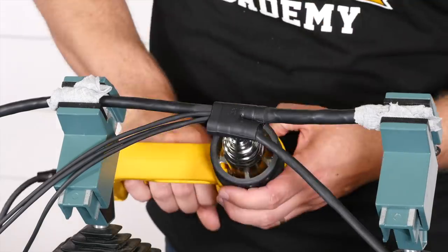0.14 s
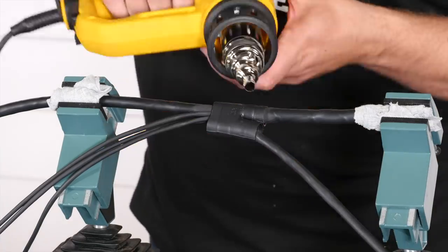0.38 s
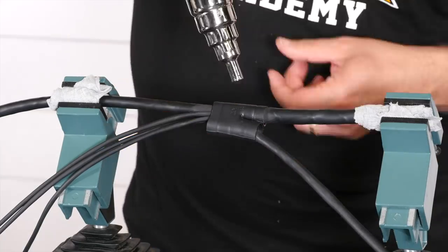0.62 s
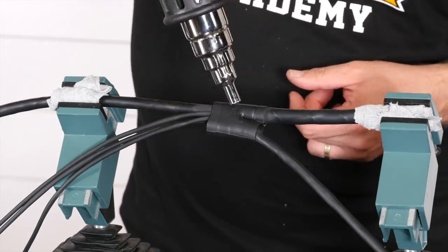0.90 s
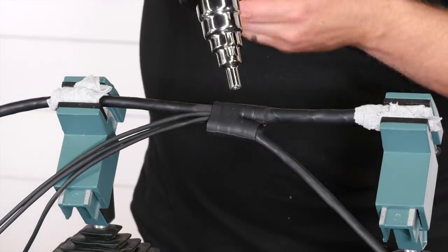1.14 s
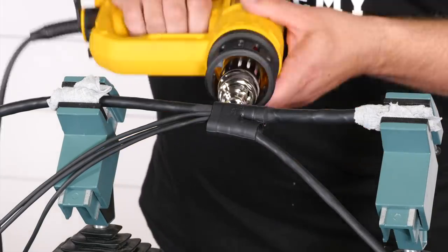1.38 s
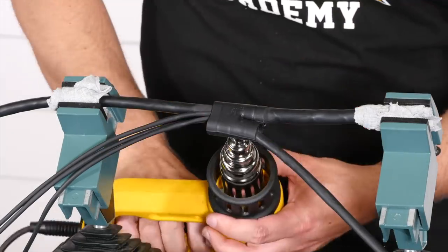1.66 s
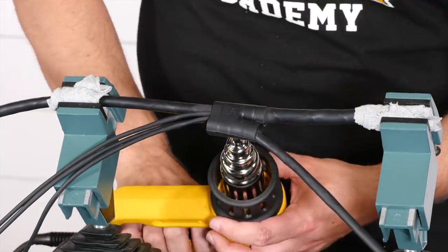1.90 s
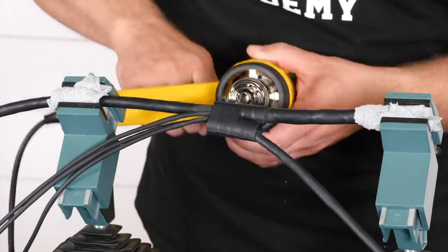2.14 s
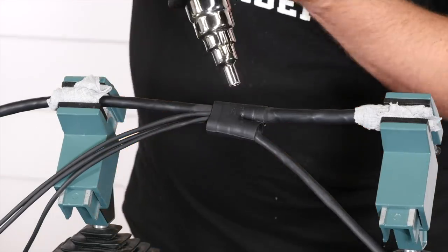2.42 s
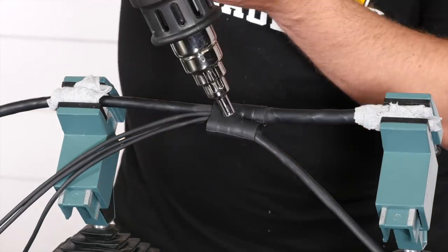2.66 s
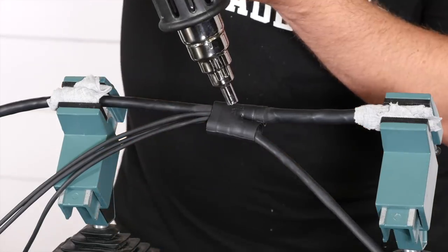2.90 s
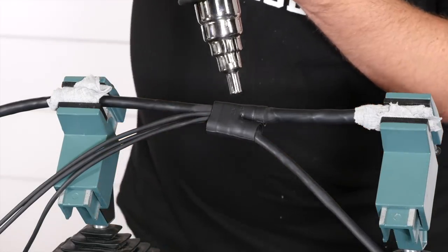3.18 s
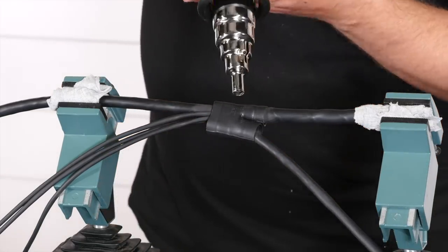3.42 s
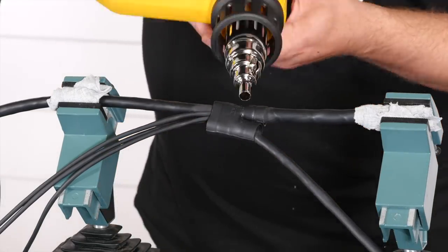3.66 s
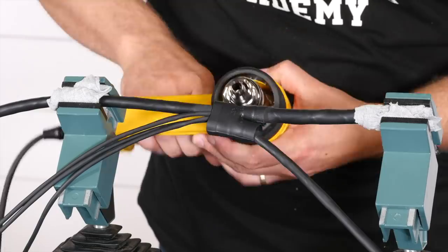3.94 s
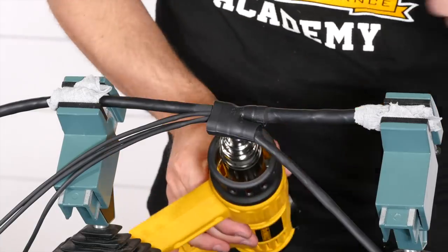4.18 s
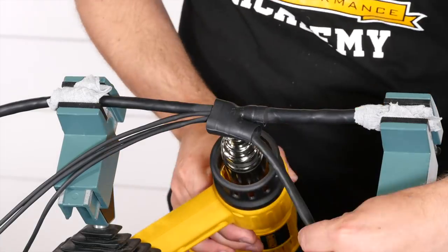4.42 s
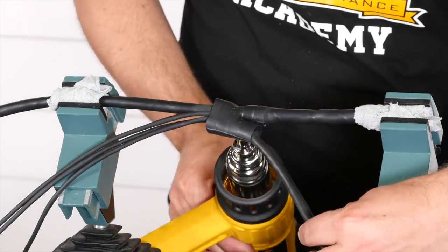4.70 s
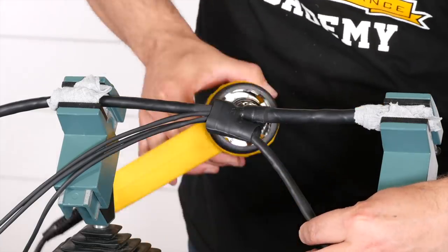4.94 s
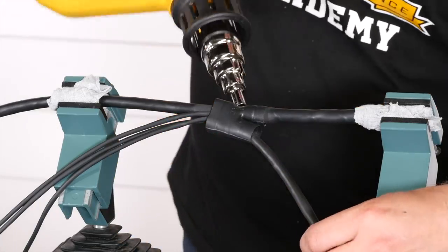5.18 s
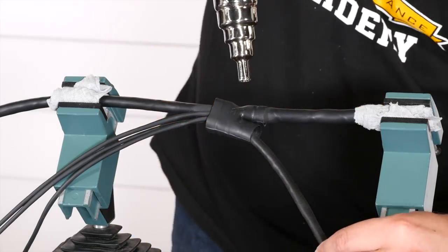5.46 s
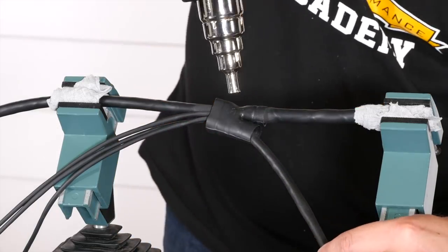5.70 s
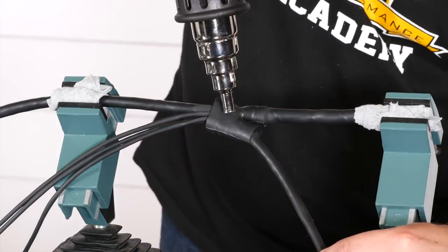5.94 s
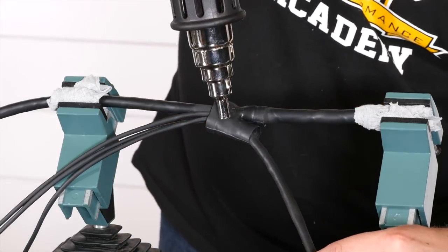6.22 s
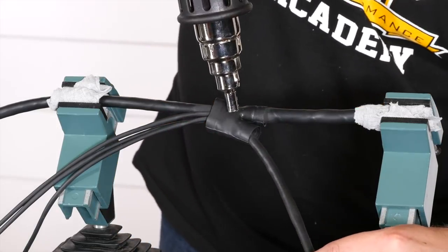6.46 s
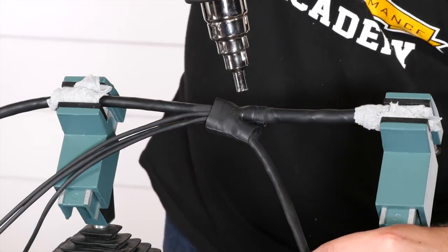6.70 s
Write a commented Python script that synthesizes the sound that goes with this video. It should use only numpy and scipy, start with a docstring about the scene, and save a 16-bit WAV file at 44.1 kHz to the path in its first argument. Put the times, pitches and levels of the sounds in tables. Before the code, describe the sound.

A heat gun runs without pause close by in a workshop. Its hissing airflow and high, layered fan whine shift in tone as the nozzle turns around a cable splice. A few soft plastic knocks come early, then a small knock and faint cable rubbing past the middle. Low machine hum lies underneath; the stereo pickup is close, with slight wall reflections.

```python
"""A fan whines and air rushes as an electric heat gun is swung around a cable splice on a workbench.
The whine is a stack of sines on the blade tone; the rush is shaped noise from the barrel, and its
colour changes as the gun turns. Steady workshop hums, made of wavering sines, and a low noise floor
lie underneath. The harness knocks softly in its clamps as short rings and drags as narrow noise."""
import sys
import numpy as np
from scipy import signal
from scipy.fft import rfft, irfft, next_fast_len
from scipy.io import wavfile
from scipy.ndimage import uniform_filter1d

SR = 44100
rng = np.random.default_rng(int(sys.argv[2]) if len(sys.argv) > 2 else 0)


def persist_wave(psi):
    """Save psi, clipped to +-1, as 16-bit WAV."""
    counts = np.round(np.clip(psi, -1, 1) * 32767).astype(np.int16)
    wavfile.write(sys.argv[1], SR, np.atleast_2d(counts).T)


def ratio_of_db(decibels):
    """Turn decibels (scalar or array-like) into linear amplitude factors; 0 dB maps to 1."""
    return 10 ** (np.asarray(decibels, float) / 20)


N = 301644  # length in samples
T = np.arange(N) / SR  # time in seconds
SIZE = next_fast_len(N)
F = np.arange(SIZE // 2 + 1) * SR / SIZE  # frequencies of the spectrum in Hz

# The ringing modes of the clamp. Each row: frequency in Hz, level in dB added to that of the knock,
# time to fade by 60 dB in seconds.
CLAMP = [(410, -9, .05), (490, 0, .07), (650, -1, .06), (980, -4, .05)]
# The swing of the gun. Each row: time in seconds, tilt (0 behind the cable, 1 side-on, 2 tipping down,
# 3 or more nozzle down), level of the rush in dB.
SWING = [(0, 0.6, -1.1), (.13, .5, -.4), (.26, 0.5, -1.3), (.39, 1, 0.65), (.52, 1.4, -1.2),
         (.65, 2.5, 0.3), (.78, 3, -0.38), (1.06, 3, -0.39), (1.3, 2.05, 0), (1.43, 1, -0.63),
         (1.7, 0.26, -0.51), (2.09, 0.36, -.6), (2.22, 0.96, -1), (2.35, 1, -.9), (2.64, 3.5, -.1),
         (3.14, 3, -0.4), (3.5, 2, .3), (3.76, 1, -.5), (4.04, 1, -1), (4.16, 0.6, -1.6), (4.28, 0, -.6),
         (4.85, 0, -.5), (5.07, 0.56, -.7), (5.2, 1, -0.54), (5.31, 2, -.7), (5.47, 2, -.8),
         (5.72, 3, -0.034), (5.98, 3, 0.065), (6.84, 3, -.2)]


def curve(points):
    """Joins (Hz, value) points with straight lines on a log-frequency axis."""
    hz, value = np.transpose(points)
    return np.interp(np.log(F + 1), np.log(hz), value)


def noise(density):
    """Random noise whose spectrum follows the given power per Hz (two-sided)."""
    white = rfft(rng.standard_normal(SIZE))
    return irfft(white * np.sqrt(density * SR), SIZE)[:N]


def walk(rate):
    """A slow random wander: levels held for 1 / rate seconds, smoothed twice, with a spread near 1."""
    hold = int(SR / rate)
    steps = np.repeat(rng.standard_normal(N // hold + 1), hold)
    smooth = uniform_filter1d(uniform_filter1d(steps, hold), hold)
    return 1.284 * smooth[:N]  # makes up for the spread lost in smoothing


def tone(phase, db):
    """A sine of the given rms level in dB, from a random starting point."""
    return np.sqrt(2) * ratio_of_db(db) * np.sin(phase + 2 * np.pi * rng.random())


def scatter(echo_db, decay_s):
    """Ripple in power, about 1 on average, left by a short spray of echoes off bench, hands and clamps."""
    t = T[:SR // 50]
    spray = rng.standard_normal(len(t)) * np.exp(-t / decay_s)
    unit_spray = spray / np.sqrt(np.sum(spray ** 2))
    echoes = ratio_of_db(echo_db) * rfft(unit_spray, SIZE)
    return abs(1 + echoes) ** 2 / (1 + ratio_of_db(echo_db) ** 2)


def poses():
    """Power share of each pose: behind the cable, side-on, tipping down, down high, down close."""
    close_from_s = 5.0  # from here the nozzle comes down close to the splice
    s, tilt, _ = np.transpose(SWING)
    tilt_now = np.clip(np.interp(T, s, tilt), 0, 3)
    # neighbouring poses blend into each other
    shares = np.clip(1 - abs(tilt_now - np.arange(4)[:, None]), 0, 1)
    behind, side_on, tipping, down = shares
    close = T > close_from_s
    return np.array([behind, side_on, tipping, down * ~close, down * close])


def hums():
    """Steady machine hums: sines that waver a little in pitch and level."""
    # Each row: frequency in Hz, rms level in dB, both before wavering.
    hum_tones = [(242.2, -69), (473.7, -74), (576.0, -60), (1152, -68)]
    total = 0
    for hz, db in hum_tones:
        phase = 2 * np.pi * np.cumsum(hz + 0.5 * walk(2.975)) / SR
        total = total + tone(phase, db + 0.55 * walk(6))
    return total


def shop_floor():
    """Low workshop noise that reaches both sides alike."""
    # Each row: frequency in Hz, power in dB per Hz.
    floor_points = [(20, -102), (200, -102), (330, -100), (450, -98), (700, -94), (900, -91.5),
                    (1050, -97.5), (1300, -92), (2000, -110)]
    return noise(ratio_of_db(curve(floor_points)) ** 2)


def shop_floor_wide():
    """The part of the low workshop noise that differs between left and right."""
    # Each row: frequency in Hz, power in dB per Hz.
    wide_points = [(20, -106), (300, -107), (950, -109), (1400, -116), (2000, -125)]
    return noise(ratio_of_db(curve(wide_points)) ** 2)


def knocks():
    """Each nudge rings the clamp with its own mix of fading modes, with a small plastic click on top."""
    # Harness in its clamps. Each row: start in seconds, base level of the clamp modes in dB,
    # base level of the click modes in dB.
    nudges = [(.250, -52, -50), (.356, -70, -47), (.381, -70, -33), (.463, -43, -36), (2.313, -53, -60),
              (4.312, -46, -48), (4.620, -46, -60), (4.665, -52, -62), (4.697, -50, -62), (4.812, -52, -62)]
    # Modes of the click. Each row: frequency in Hz, level in dB added to that of the click,
    # time to fade by 60 dB in seconds.
    click_modes = [(1150, -9, .03), (1650, -2, .03), (1830, 0, .03), (2050, -1, .025)]
    out = np.zeros(N + SR)
    t = T[:SR // 4]
    soft_contact = 1 - np.exp(-t / 0.0015)
    mix = rng.standard_normal((len(nudges), len(CLAMP) + len(click_modes)))
    for (s, db, click_db), chance in zip(nudges, mix):
        modes = [(hz, db + gain, t60) for hz, gain, t60 in CLAMP]
        modes += [(hz, click_db + gain, t60) for hz, gain, t60 in click_modes]
        ring = 0
        for (hz, level, t60), c in zip(modes, chance):
            fade = 1000 ** (-t / t60)
            ring = ring + ratio_of_db(level + 1.2 * c) * np.sin(2 * np.pi * hz * t) * fade
        i = int(s * SR)
        out[i:i + len(t)] += ring * soft_contact
    return out[:N]


def rub():
    """The cable drags in its clamp: uneven friction keeps the clamp's main mode ringing."""
    # Cable drags. Each row: start in seconds, length in seconds, rms level in dB before it flickers.
    drags = [(4.32, .22, -66), (4.55, .18, -63), (4.78, .09, -62)]
    edge_s = 0.046  # fade time, centred on each end of a drag
    shape = 0
    for s, length, db in drags:
        inside = np.minimum(T - s, s + length - T)
        shape = shape + ratio_of_db(db) * np.clip(inside / edge_s + 0.5, 0, 1)
    hz, _, t60 = CLAMP[1]
    # the longer a mode rings, the narrower its peak
    detune = (F - hz) * np.pi * t60 / np.log(1000)
    drag = noise(1 / (1 + detune ** 2) ** 2)
    return drag / drag.std() * shape * ratio_of_db(2 * walk(40))


def wall_rush():
    """Rush off the walls: drifting layers, each with its own ripple, fading slowly in and out at random."""
    # What reaches left and right unalike. Each row: frequency in Hz,
    # power in dB per Hz before the layers ripple and fade.
    wall_points = [(1300, -125), (2400, -112), (3200, -88.5), (4200, -88.5), (5900, -82.5), (7500, -91.5),
                   (9200, -89.5), (10300, -89.5), (16000, -91)]
    total = 0
    for _ in range(3):
        fade = ratio_of_db(2.1 * walk(1.48) - 4.5)
        ripple = scatter(echo_db=1, decay_s=0.0026)
        total = total + fade * noise(ratio_of_db(curve(wall_points)) ** 2 * ripple)
    return total


def air(echo_db, decay_s):
    """Turbulent jet plus barrel resonances; each pose gives another mix of them and other echoes."""
    # Barrel and vent resonances. Each row: frequency in Hz, width in Hz (where power is a quarter),
    # then peak power in dB per Hz with the nozzle down high, down close, behind the cable,
    # side-on and tipping down, all before echoes and the level of the rush.
    barrel = [(1636, 243, -85, -81.5, -81, -82, -82), (2390, 645, -77, -79, -77, -77.5, -83),
              (2723, 260, -79, -77.5, -83, -74.5, -84), (3343, 490, -73.5, -74.5, -79.5, -69.5, -78),
              (3760, 1030, -82, -80.5, -82.5, -86, -83), (4660, 870, -81, -80.5, -85, -82.0, -89),
              (5270, 580, -72, -75, -74.5, -79.5, -72.5), (5684, 540, -72.5, -72.5, -74, -76.5, -71.5),
              (6485, 580, -98.5, -89, -78, -80, -73.5), (7240, 1100, -83, -76, -88, -82.5, -80.5),
              (8310, 1400, -80, -78.5, -86.5, -97, -81.5), (9170, 730, -78.5, -82, -102, -100, -95),
              (10270, 660, -80.5, -80, -83, -77.5, -79), (11380, 1060, -84, -83, -87, -86.5, -82),
              (12680, 500, -72, -73.5, -80, -82, -72.5), (13700, 790, -82.0, -80, -82, -86, -78),
              (14900, 910, -82, -85, -84, -82, -79.0)]
    # The jet itself. Each row: frequency in Hz, power in dB per Hz before echoes and rush level.
    jet = [(900, -110), (1300, -104), (1900, -93.5), (2500, -86), (6000, -82.5), (9000, -87),
           (16000, -86.5)]
    hz, width, high, close, behind, side_on, tipping = np.transpose(barrel)
    shapes = 1 / (1 + (2 * (F[:, None] - hz) / width) ** 2) ** 2
    out = 0
    for share, db in zip(poses(), (behind, side_on, tipping, high, close)):
        power = ratio_of_db(curve(jet)) ** 2 + shapes @ ratio_of_db(db) ** 2
        rush = noise(power * scatter(echo_db, decay_s))
        out = out + np.sqrt(share) * rush
    s, _, rush_db = np.transpose(SWING)
    return ratio_of_db(np.interp(T, s, rush_db)) * out


def lobes(multiple):
    """An overtone's lobe sweeps past the microphone: power of its brief swells, each a smooth hump."""
    # Each row: multiple of the blade tone, middle in seconds, length in seconds, level in dB.
    swells = [(3, .13, .4, -50), (3, .55, .2, -54), (3, 1.57, .2, -47), (3, 2.2, .2, -53),
              (3, 4.0, .4, -51), (8, .65, .15, -46), (8, 1.95, .2, -49), (8, 2.47, .15, -45),
              (8, 3.9, .2, -50), (10, .55, .25, -52), (10, 2.36, .3, -49), (10, 3.42, .3, -52)]
    power = 0
    for k, s, length, db in swells:
        if round(k) == multiple:
            power = power + ratio_of_db(db) ** 2 * np.exp(-(2 * (T - s) / length) ** 2)
    return power


def fan(flicker_db, wall_db):
    """Blade tone and multiples, heard directly and again off the walls; the speed shivers slightly."""
    # Fan speed. Each row: time in seconds, blade tone in Hz before it shivers.
    speed = [(0, 1423), (.13, 1429), (.4, 1458), (.65, 1432), (.9, 1425), (1.43, 1426), (1.69, 1445),
             (1.95, 1466), (2.24, 1474), (2.55, 1439), (2.9, 1430), (3.64, 1426), (4.02, 1431),
             (4.18, 1446), (4.42, 1437), (4.75, 1445), (4.96, 1442), (5.08, 1452), (5.4, 1432),
             (5.75, 1427), (6.84, 1428)]
    # Blade tone. Each row: time in seconds, level in dB before flicker.
    blade = [(0, -51.5), (.39, -57), (.65, -55), (.8, -50), (1.17, -52.5), (1.33, -59), (1.55, -52),
             (1.97, -61), (2.3, -55), (2.47, -55), (2.6, -48), (3.14, -48.5), (3.6, -62), (3.85, -52),
             (4.27, -56.5), (4.42, -50.5), (4.69, -45.5), (4.94, -55), (5.4, -56), (5.72, -49.5),
             (6.65, -48.5), (6.84, -51)]
    # The two loudest whistles. Each row: time in seconds, level of the fifth multiple in dB,
    # level of the seventh in dB, both before flicker.
    whistles = [(0, -50, -44), (.13, -47, -60), (.36, -65, -57), (.5, -45, -47), (.78, -52, -48),
                (.92, -45, -43), (1.1, -55, -56), (1.3, -47, -45.5), (1.43, -41.5, -54), (1.6, -52, -54),
                (1.9, -62, -64), (2.2, -58, -58), (2.33, -44, -58), (2.6, -49, -49), (2.73, -45, -43),
                (2.9, -48.5, -49), (3.14, -45, -44.5), (3.27, -57, -47), (3.38, -53, -59),
                (3.5, -45, -43.5), (3.64, -44, -58), (3.8, -41.5, -51), (4.03, -50, -49), (4.3, -66, -58),
                (4.45, -65, -50), (4.7, -72, -72), (5.07, -66, -52), (5.18, -42, -58), (5.46, -50, -62),
                (5.72, -42.5, -56), (6.2, -46, -68), (6.84, -47, -61)]
    # Overtones that beam out of the vents. Each row: multiple, then level in dB behind the cable, side-on,
    # tipping down, down high and down close, before wander, swells and flicker.
    beamed = [(3, -61, -60, -66, -64, -63), (8, -58, -58, -59, -56, -69), (10, -68, -64, -57, -63, -59)]
    # Overtones whose level wanders slowly around a fixed value. Each row: multiple,
    # that value in dB before wander and flicker.
    wandering = [(2, -63.5), (4, -69), (6, -57), (9, -56)]
    blade_hz = np.interp(T, *np.transpose(speed)) + 0.784 * walk(14)
    phase = 2 * np.pi * np.cumsum(blade_hz) / SR
    at, fifth_db, seventh_db = np.transpose(whistles)
    voices = [(1, np.interp(T, *np.transpose(blade)))]
    voices += [(5, np.interp(T, at, fifth_db)), (7, np.interp(T, at, seventh_db))]
    for k, *db in beamed:
        beam_db = np.array(db) @ poses() + 3 * walk(7)
        power = ratio_of_db(beam_db) ** 2 + lobes(round(k))
        voices.append((round(k), 10 * np.log10(power)))
    voices += [(round(k), db + 4.8 * walk(3.1)) for k, db in wandering]
    near, far = 0, 0
    for k, db in voices:
        # shorter waves flicker more in the turbulent air
        near = near + tone(k * phase, db + flicker_db * np.sqrt(k) * walk(18))
        # only multiples above the second are spread to the sides
        if k > 2:
            far = far + tone(k * phase, np.mean(db) + wall_db + 2.6 * walk(4.93))
    return near, far


def scene():
    """Everything near is central, its treble leaning right; the walls spread the rest."""
    # Lean of the central sound. Each row: frequency in Hz, left minus right in dB.
    lean_points = [(2400, 0), (4400, -2), (8000, -2.5), (16000, -4.5)]
    near, far = fan(flicker_db=0.71, wall_db=-6.0)
    rush = air(echo_db=-11.0, decay_s=0.0062)
    mid = near + rush + hums() + knocks() + rub() + shop_floor()
    side = far + wall_rush() + shop_floor_wide()
    lean = ratio_of_db(curve(lean_points))
    # a filtered copy of the middle in the side signal tilts left against right
    side = side + irfft(rfft(mid, SIZE) * (lean - 1) / (lean + 1), SIZE)[:N]
    return np.array([mid + side, mid - side])


def top_cut(x):
    """Nothing passes above the cut-off."""
    return signal.sosfilt(signal.butter(12, 16790, fs=SR, output="sos"), x)


def record(dry):
    """Cuts the top of the spectrum steeply, as a sharp low-pass filter does."""
    top_hz = 15730
    low_pass = signal.ellip(12, 0.2, 70, top_hz, fs=SR, output="sos")  # 0.2 dB ripple, 70 dB down
    mix = signal.sosfilt(low_pass, dry)
    return top_cut(mix)


dry = scene()
out = record(dry)
persist_wave(out)
```